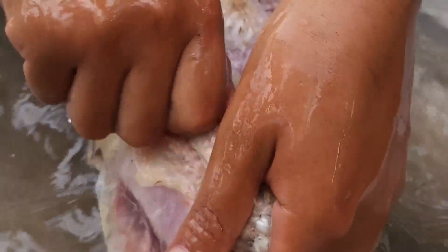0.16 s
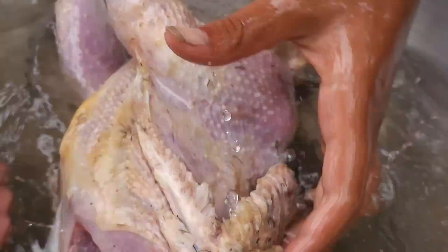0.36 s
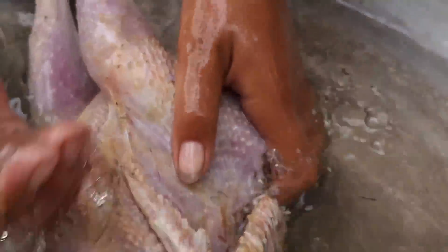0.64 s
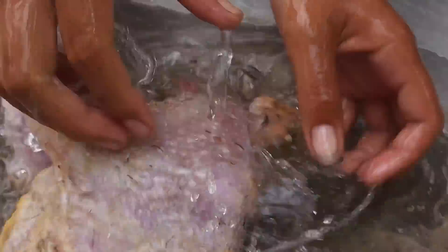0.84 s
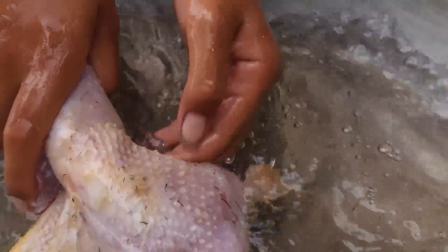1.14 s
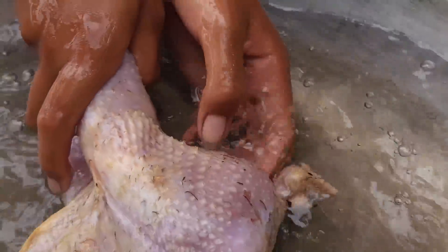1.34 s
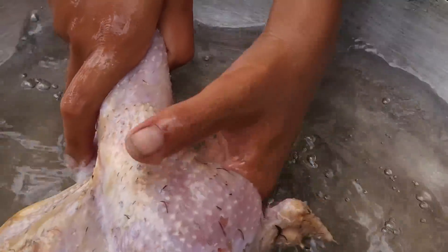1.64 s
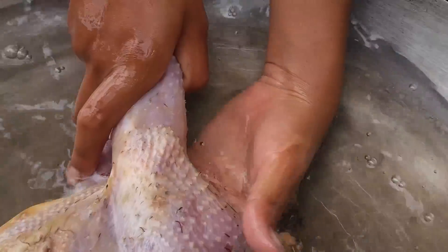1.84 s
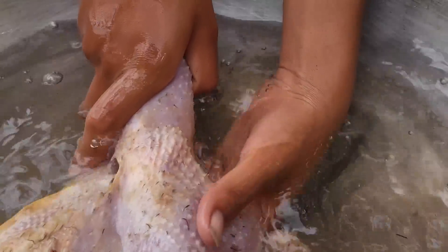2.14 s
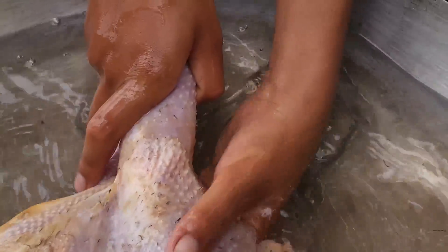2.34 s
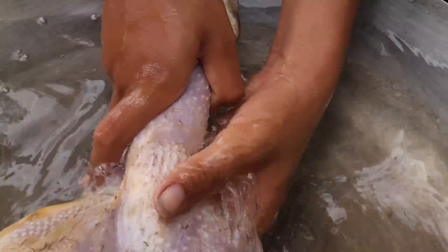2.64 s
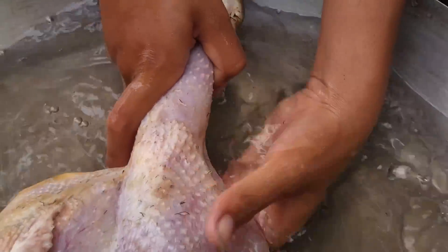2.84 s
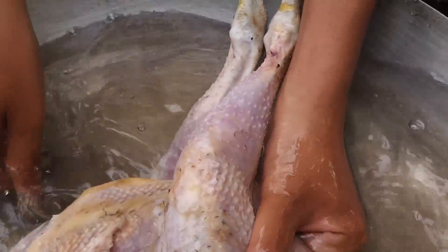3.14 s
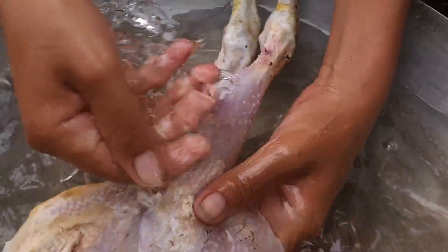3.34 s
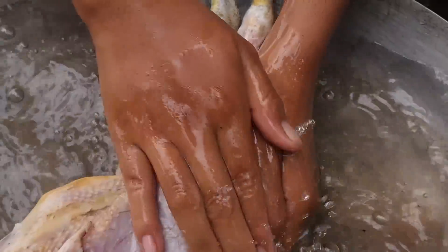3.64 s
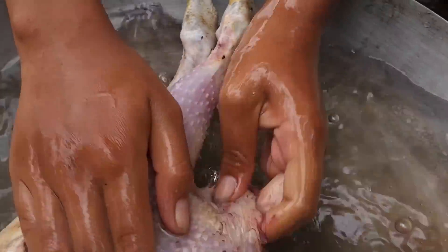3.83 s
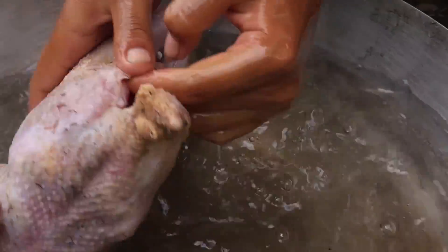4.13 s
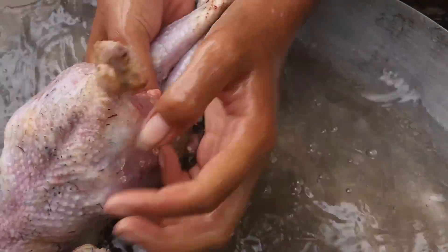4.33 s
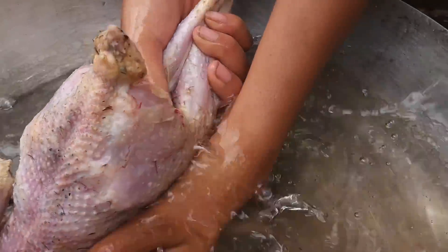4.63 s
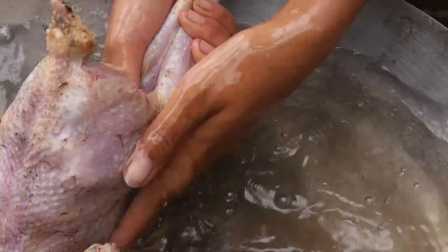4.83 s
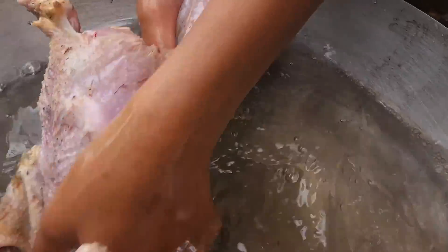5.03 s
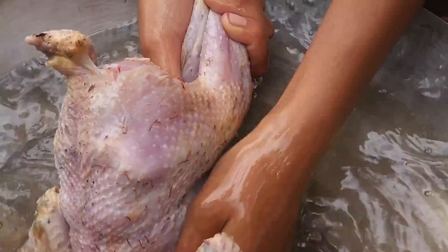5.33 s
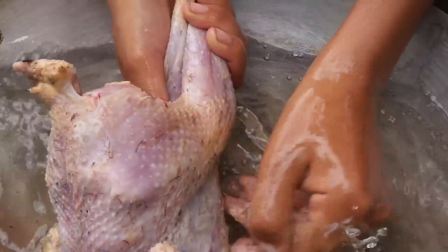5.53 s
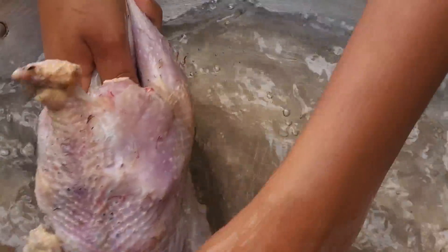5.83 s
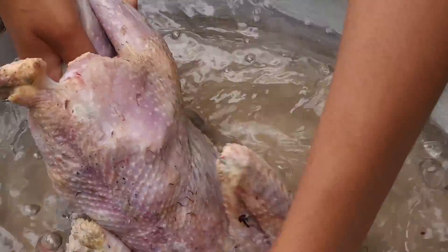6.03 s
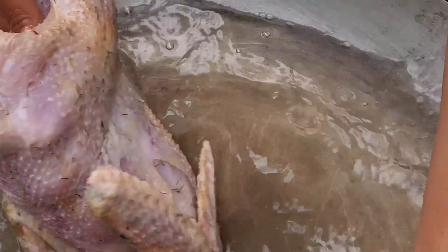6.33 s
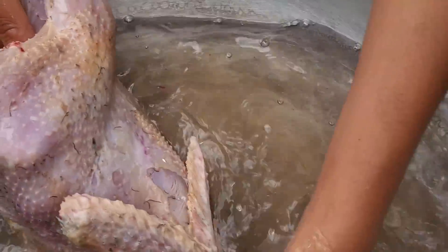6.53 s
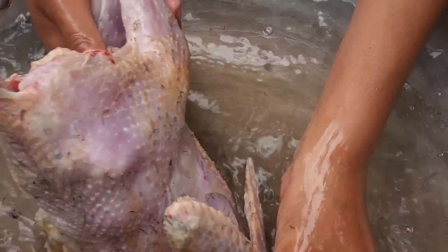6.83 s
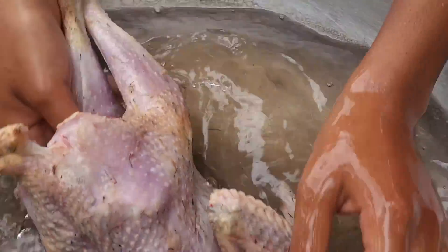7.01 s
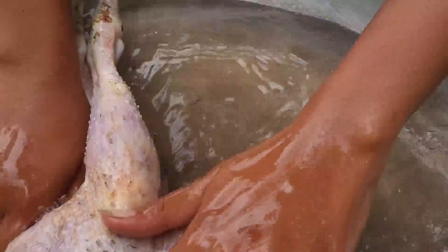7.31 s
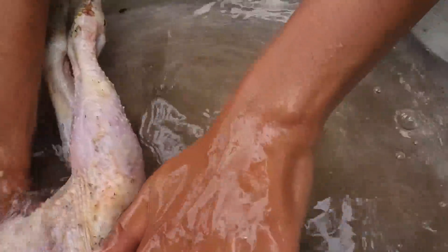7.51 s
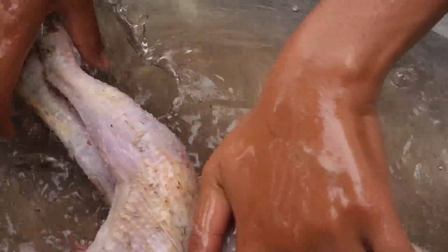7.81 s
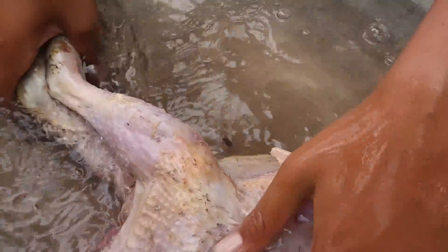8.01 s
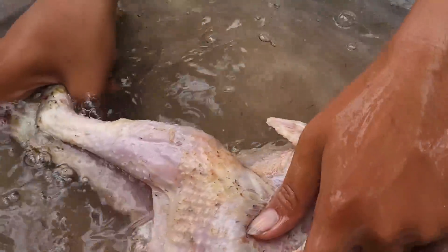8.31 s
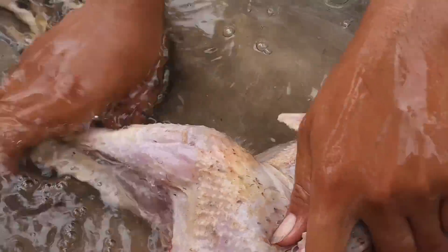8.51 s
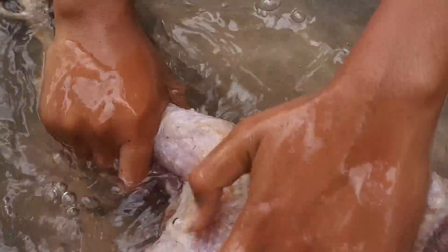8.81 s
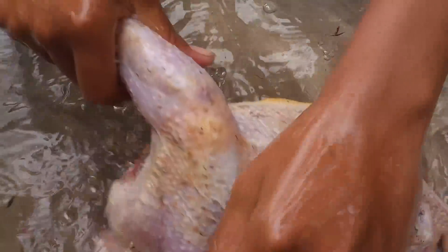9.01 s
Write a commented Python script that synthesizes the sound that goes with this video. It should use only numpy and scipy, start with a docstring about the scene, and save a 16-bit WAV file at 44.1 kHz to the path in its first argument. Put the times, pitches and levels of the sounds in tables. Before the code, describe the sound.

Close up, two hands wash a plucked chicken in a basin of water, with splashes, wet smacks, bubbly sloshing, gulps and plops outdoors.

```python
"""Two hands wash a plucked chicken in a wide basin of water, outdoors, close by.
Strokes are enveloped noise and bubbles: each sloshes, traps bubbles that ring and rise in pitch, and sprays.
Wet skin smacks and hollows gulp as decaying noise in a resonant band; splashes slap and single bubbles plop.
Behind lie a low outdoor rumble and a thin hiss of shaped noise, and a distant motor, a single sine."""
import sys
import numpy as np
from scipy import signal
from scipy.io import wavfile
from scipy.ndimage import uniform_filter1d

SR = 44100
rng = np.random.default_rng(int(sys.argv[2]) if len(sys.argv) > 2 else 0)


def master(y):
    """Save y as 16-bit WAV."""
    cut = np.clip(np.atleast_2d(y).T, -1, 1)
    pcm = np.round(cut * 32767)  # scale
    wavfile.write(sys.argv[1], SR, pcm.astype(np.int16))


N = 403956

# handfuls of water landing: (time [s], relative churning level [dB], relative spray level [dB],
# centre of the slap [Hz])
SPLASH_EVENTS = [(0.486, -67, -56, 2600), (0.852, -52, -40, 3200), (0.947, -45.5, -53, 1770),
                 (3.252, -43.5, -48, 2140), (3.486, -45, -47, 4300), (4.148, -57, -55, 3000),
                 (5.884, -51, -84, 2500), (6.152, -68, -39, 3940), (6.959, -57, -52, 2560),
                 (7.615, -45.5, -51, 2900), (7.907, -53, -49, 4100), (7.993, -55, -49.5, 2710),
                 (8.541, -77, -49, 1200), (8.93, -79, -50.5, 4770), (9.108, -51.5, -79, 4000)]


def from_db(db):
    """Level to amplitude: 20 dB is a factor of ten."""
    return 10 ** (np.asarray(db) / 20)


def rms_one(x):
    """Normalisation: scale to unit mean power."""
    return x / np.sqrt(np.mean(x ** 2) + 1e-20)


def at_hz(points, hz):
    """Logarithmic frequency: read a table with equal steps per octave."""
    table_hz, values = np.transpose(points)
    return np.interp(np.log(hz), np.log(table_hz), values)


def band(x, low_hz, high_hz, order=2):
    """Band limitation: a Butterworth band-pass."""
    sos = signal.butter(order, [low_hz, high_hz], "band", fs=SR, output="sos")
    return signal.sosfilt(sos, x)


def add(out, s, sound):
    """Superposition: mix a stereo sound in at time s."""
    i = int(np.clip(s * SR, 0, N - 1))
    out[:, i:i + sound.shape[1]] += sound[:, :N - i]


def panned(x, pan_db):
    """Interaural level difference: lean a sound to the left by pan_db."""
    return x * rms_one(from_db([[pan_db / 2], [-pan_db / 2]]))


def spread(mid, side, apart):
    """Sum and difference: an unrelated side signal, opposite in the two channels, widens the sound."""
    return mid + apart * side * [[1], [-1]]


def coloured(source, spectrum):
    """Spectral shaping by third-octave bands, each with its own left-right coherence; rms 1."""
    # left-right likeness: (frequency [Hz], correlation [-1..1])
    likeness = [(60, 1), (250, 0.9), (600, 0), (1200, 0), (3000, 0.25), (12000, 0.29)]
    out = 0
    edges = 20 * 2 ** (np.arange(30) / 3)
    for k, (low, high) in enumerate(zip(edges, edges[1:])):
        if high <= spectrum[0][0] or low >= spectrum[-1][0]:
            continue
        hz = np.sqrt(low * high)
        mid, side = band(source[k % 2], low, high)  # neighbouring bands take different sources
        alike = at_hz(likeness, hz)
        stereo = spread(np.sqrt(1 + alike) * mid, np.sqrt(1 - alike) * side, 1)
        out = out + from_db(at_hz(spectrum, hz)) * stereo
    return rms_one(out)


def evened(x, window_s):
    """Power normalisation over a short window, so that the stroke sets the loudness."""
    size = max(int(window_s * SR), 2)
    power = np.mean(x ** 2, axis=0)
    power = uniform_filter1d(uniform_filter1d(power, size), size)
    return x / np.sqrt(np.abs(power) + np.mean(power) / 100)


def patter(per_s, spread_db, life_s):
    """Shot noise: envelope of many random little impacts that decay exponentially; rms 1."""
    strength_db = spread_db * np.minimum(rng.exponential(1, N), 4.5)
    hits = (rng.random(N) < per_s / SR) * from_db(strength_db)
    power = signal.lfilter([1], [1, -np.exp(-1 / (life_s * SR))], hits ** 2 + 1e-12)
    return rms_one(np.sqrt(power))


def grit(envelope, low_hz, high_hz, apart):
    """Amplitude modulation: band-limited grains of water noise under an envelope; rms 1."""
    mid, side = band(rng.standard_normal((2, N)) * envelope, low_hz, high_hz)
    return rms_one(spread(mid, side, apart))


def bubble(hz, t60, rise, lag):
    """Bubble resonance: it swells in a cycle or two, rings and climbs in pitch as it nears the surface."""
    t = np.arange(int((t60 + abs(lag)) * SR) + 2) / SR
    t = np.maximum(t - [[0], [lag]], 0)  # a positive lag delays the right channel
    swell = 1 - np.exp(-.8 * hz * t)
    phase = 2 * np.pi * hz * (t + rise * t * t / 2)
    return swell * from_db(-60 * t / t60) * np.sin(phase)


def swarm(low_hz, high_hz, cycles, rise, spread_db, lag_s, count):
    """Damping per cycle: of bubbles random in size and place, small ones are higher and tend to die sooner."""
    out = np.zeros((2, N))
    for when, size, strength, damping, depth, place, path in rng.random((count, 7)):
        hz = low_hz * (high_hz / low_hz) ** size
        t60 = cycles * (.5 + damping) / hz
        ring = bubble(hz, t60, 2 * depth ** 2 * rise / t60, lag_s * (2 * path - .5))
        gain = from_db(spread_db * strength ** 2) * np.sqrt(hz)
        add(out, when * N / SR, gain * panned(ring, 12 * (place - .5)))
    return rms_one(out)


def burst(hz, t60, width, skirt_db, attack_share, apart):
    """Cavity resonance: a collapsing film shakes it, with a broad skirt; long bursts build up slowly."""
    t = np.arange(int(t60 * SR) + 400) / SR
    mid, side = rng.standard_normal((2, len(t)))
    attack = 1 - np.exp(-t / (attack_share * t60))
    shake = spread(mid, side, apart) * from_db(-60 * t / t60) * attack
    resonance = band(shake, hz / (1 + width), hz * (1 + width))
    skirt = band(shake, hz / 1.85, hz * 1.44, order=1)
    sound = resonance + from_db(skirt_db) * skirt
    # same energy as an exponential decay that starts at unit power
    energy = t60 * SR / np.log(1e6)
    return sound * np.sqrt(energy / np.mean(np.sum(sound ** 2, axis=1)))


def surge(s, length_s, attack_s, release_s, swell_db):
    """Build-up and relaxation: moving water grows, swells or fades, drops back and leaves a weaker run-off."""
    runoff_db, runoff_s = -18, 0.12  # water runs off the bird: relative level, time constant
    t = np.maximum(np.arange(0, N, 20) / SR - s, 0)
    after = np.maximum(t - length_s, 0)
    swell = from_db(swell_db * (np.minimum(t / length_s, 1) - .5))
    body = (1 - np.exp(-t / attack_s)) * swell
    release = np.exp(-after / release_s)
    runoff = from_db(runoff_db) * np.exp(-after / runoff_s)
    return body * np.maximum(release, runoff)


def agitation():
    """Power addition: strokes and splashes join the resting water in slosh, churning and spray."""
    # strokes of the hands: (time [s], length [s], relative deep slosh level [dB],
    # relative churning level [dB], relative spray level [dB], swell from start to end [dB])
    strokes = [(0.0, 0.025, -64, -48.5, -46, -6), (0.334, 0.11, -77, -54.5, -52.5, -2),
               (0.405, 0.13, -72, -52, -55.5, 8.5), (0.585, 0.2, -79, -53, -51.5, -1),
               (0.795, 0.2, -67.5, -49.5, -48.5, -12.5), (0.98, 0.1, -69, -61, -53, 1),
               (1.121, 0.09, -70, -58.5, -60.5, -4.5), (1.33, 0.18, -102, -85, -66.5, -14),
               (1.538, 0.11, -57.5, -67.5, -65, -8), (1.734, 0.15, -62.5, -70, -96, 6),
               (1.932, 0.23, -60, -70.5, -96, -11), (2.15, 0.35, -62, -68, -91, -15),
               (2.386, 0.14, -69.5, -61.5, -71, 0), (2.563, 0.47, -67.5, -67.5, -66.5, -13),
               (2.86, 0.26, -61, -66, -68.5, -8), (3.132, 0.21, -61.5, -49.5, -58, -2.5),
               (3.35, 0.21, -59, -53.5, -52, -2), (3.597, 0.047, -59.5, -46.5, -45.5, 7),
               (3.777, 0.048, -64.5, -85, -76.5, 21.5), (3.975, 0.05, -54, -58.5, -61, 8),
               (4.066, 0.41, -64, -64, -64, -9.5), (4.456, 0.26, -69.5, -66.5, -64.5, -3.5),
               (4.687, 0.18, -61.5, -65, -61, -2), (4.886, 0.26, -63.5, -57, -54.5, 7.5),
               (5.149, 0.24, -56.5, -64, -66, 7), (5.361, 0.072, -82, -57, -56, 23.5),
               (5.561, 0.27, -77, -58.5, -58, 7), (5.809, 0.24, -64.5, -52, -53.5, -1),
               (6.111, 0.15, -79, -57, -58, 14.5), (6.274, 0.28, -80.5, -71.5, -66.5, -4),
               (6.95, 0.2, -66.5, -56.5, -58, 1.5), (7.18, 0.14, -58.5, -52, -53.5, 6),
               (7.451, 0.19, -68.5, -55, -58.5, -7), (7.614, 0.24, -71.5, -50, -50.5, 3.5),
               (7.877, 0.21, -77.5, -58, -58, -14), (7.998, 0.64, -79.5, -73.5, -69.5, -18.5),
               (8.516, 0.24, -64, -59, -60.5, -7), (8.808, 0.2, -73, -58, -56.5, 2),
               (8.992, 0.15, -90, -69, -56.5, 19)]
    rest_db = [-85, -83, -81]  # slosh, churning, spray: the basin never quite settles
    stroke_attack_s, stroke_release_s = 0.0041, 0.018  # time constants
    splash_attack_s, splash_hold_s, splash_release_s = 0.0011, 0.02, 0.013
    thrown_db = -1  # droplets thrown by a splash, relative to its spray level
    steps = np.arange(0, N, 20)  # every 20th sample is enough for slow curves
    power = np.outer(from_db(rest_db) ** 2, np.ones(len(steps)))
    for s, length_s, *db, swell_db in strokes:
        course = surge(s, length_s, stroke_attack_s, stroke_release_s, swell_db)
        power += np.outer(from_db(db) ** 2, course ** 2)
    for s, churn_db, spray_db, _ in SPLASH_EVENTS:
        course = surge(s, splash_hold_s, splash_attack_s, splash_release_s, 0)
        power[1:] += np.outer(from_db([churn_db, spray_db + thrown_db]) ** 2, course ** 2)
    return [np.interp(np.arange(N), steps, np.sqrt(p)) for p in power]


def spray(mist_db, fizz_db):
    """Droplet impact: drops tick on the surface and leave tiny ringing bubbles, over a fine mist."""
    # colour of the ticks and mist: (frequency [Hz], relative level [dB per Hz])
    colour = [(2000, -29), (3000, -2), (4000, -3), (7500, -1), (10000, -25), (13000, 6.5), (16000, -31)]
    drops = patter(per_s=420, spread_db=6.5, life_s=0.0016)
    ticks = coloured(rng.standard_normal((2, 2, N)) * (drops + from_db(mist_db)), colour)
    fizz = swarm(2700, 8200, cycles=62, rise=.14, spread_db=15, lag_s=.0002, count=3800)
    finest = swarm(8000, 15000, cycles=45, rise=.05, spread_db=26, lag_s=.0002, count=1200)
    droplets = ticks + from_db(fizz_db) * (fizz + from_db(-5.0) * finest)
    return evened(droplets, .06)


def washing(slosh_gain, churn_gain, spray_gain):
    """Air entrainment: strokes break water into grains; harder churning favours the ringing bubbles."""
    laps = patter(per_s=200, spread_db=4, life_s=0.005) + from_db(-12)
    big = swarm(420, 850, cycles=15, rise=.3, spread_db=17, lag_s=.00015, count=600)
    middling = swarm(740, 2700, cycles=44, rise=.35, spread_db=20, lag_s=.00025, count=3000)
    # bubbles stand 2 to 6 dB above the grains
    churn_db = 20 * np.log10(churn_gain)
    trapped = from_db(np.clip(3 + .3 * (churn_db + 52), 2, 6))
    low_grit = from_db(-3) * grit(laps, 165, 290, apart=0.13)
    upper_grit = from_db(-6) * grit(laps, 414, 656, apart=0.41)
    slosh = evened(big + low_grit + upper_grit, 0.05)
    churn = evened(trapped * middling + grit(laps, 875, 2770, apart=1.0), 0.05)
    droplets = spray(mist_db=-19, fizz_db=-1.0)
    return panned(slosh_gain * slosh + churn_gain * churn + spray_gain * droplets, 3.6)


def drips(splashing, level_db, follow):
    """Bubble resonance: stray drops from hands and bird, louder while the water is being worked."""
    drops = swarm(600, 4200, cycles=14, rise=.2, spread_db=9, lag_s=.0002, count=230)
    return panned(from_db(level_db) * rms_one(splashing) ** follow * drops, 6)


def background(rumble_db, hiss_db, air_db, motor_hz):
    """Stationary noise: rumble, hiss with a band of air, and a far motor tone that sinks, then comes up late."""
    # colours of the two noises: (frequency [Hz], relative level [dB per Hz])
    rumble_colour = [(22, -11), (35, -9.5), (55, 2.5), (80, -1), (130, -1.5), (220, -9), (400, -25),
                     (1500, -30.5), (3000, -24.5)]
    hiss_colour = [(1500, -25), (3000, 2.5), (4500, 8), (7000, 12.5), (12000, 7), (16000, 6)]
    # the distant motor: (time [s], level [dB])
    motor_course = [(0, -81), (.6, -74), (1.2, -126), (7.9, -73), (8.4, -66.5), (9.16, -66)]
    t = np.arange(N) / SR
    rumble = from_db(rumble_db) * coloured(rng.standard_normal((2, 2, N)), rumble_colour)
    hiss = panned(from_db(hiss_db) * coloured(rng.standard_normal((2, 2, N)), hiss_colour), 1.9)
    air = from_db(air_db) * rms_one(band(rng.standard_normal((2, N)), 7900, 11550, order=10))
    motor_db = np.interp(t, *np.transpose(motor_course))
    motor = from_db(motor_db) * np.sqrt(2) * np.sin(2 * np.pi * motor_hz * t)
    return rumble + hiss + air + motor


def smacks(level_db, pan_db):
    """Impulsive excitation: short bright smacks of wet skin and landing water, scattered left of centre."""
    # smacks: (time [s], relative level [dB], centre [Hz], 60 dB decay time [s])
    smack_events = [(0.0074, -35, 6070, 0.014), (0.649, -32, 5950, 0.0066), (0.797, -36, 4670, 0.0069),
                    (1.069, -39.5, 4130, 0.0068), (1.1021, -27.5, 7500, 0.0062),
                    (1.339, -45.5, 2360, 0.022), (1.54, -38, 7700, 0.011), (1.967, -47.5, 3030, 0.013),
                    (2.123, -44.5, 6900, 0.0072), (2.654, -32.5, 6550, 0.0071), (3.153, -28, 6130, 0.0058),
                    (3.4433, -38.5, 6470, 0.01), (3.525, -32, 5460, 0.0077), (3.5414, -31.5, 5000, 0.0081),
                    (3.617, -33, 6250, 0.01), (3.636, -31, 8550, 0.013), (4.0173, -40, 3420, 0.013),
                    (4.129, -41, 3330, 0.0085), (4.296, -43.5, 2500, 0.047), (4.329, -22.5, 6750, 0.0058),
                    (4.411, -38, 8000, 0.019), (4.4947, -42.5, 7030, 0.006), (4.5338, -39, 7460, 0.011),
                    (4.584, -37.5, 5340, 0.013), (4.6554, -28, 3300, 0.0059), (5.024, -34, 6750, 0.017),
                    (5.1035, -23, 3100, 0.009), (5.1484, -27, 5040, 0.0037), (5.645, -40.5, 8380, 0.011),
                    (5.827, -40, 7160, 0.012), (5.949, -36.5, 6900, 0.011), (6.155, -25, 5600, 0.017),
                    (6.532, -40.5, 3250, 0.011), (6.575, -38, 5470, 0.013), (6.813, -45.5, 3700, 0.012),
                    (6.8668, -45, 3530, 0.011), (7.073, -35.5, 5750, 0.014), (7.286, -38, 5500, 0.01),
                    (7.309, -39, 3350, 0.0086), (7.446, -36, 5950, 0.015), (7.6145, -30.5, 2850, 0.0082),
                    (7.899, -33, 7100, 0.012), (7.954, -35, 7200, 0.0077), (8.0681, -40, 2900, 0.018),
                    (9.107, -31, 3130, 0.0089)]
    out = np.zeros((2, N))
    for s, db, hz, t60 in smack_events:
        sound = burst(hz, np.clip(t60, .002, .2), width=0.13, skirt_db=-7.5, attack_share=0.15, apart=1.0)
        add(out, s, from_db(db + level_db) * panned(sound, pan_db + rng.normal()))
    return out


def gulps(level_db, thud_db, thud_hz, thud_t60):
    """Cavity closure: dull gulps break up into dying runs of bubbles; deeper ones thud more in the water."""
    # air pockets closing under hand and bird: (time [s], relative level [dB], centre [Hz],
    # 60 dB decay time [s], held to 0.2 s at most in the gulp itself)
    pockets = [(0.019, -44.5, 645, 0.029), (0.455, -43, 800, 0.046), (0.523, -46.5, 674, 0.11),
               (1.066, -47, 850, 0.16), (1.185, -48, 368, 0.052), (1.741, -43, 410, 0.027),
               (1.942, -44.5, 430, 0.087), (2.169, -39, 372, 0.054), (2.361, -43.5, 540, 0.17),
               (2.602, -40, 410, 0.052), (3.987, -47, 810, 0.065), (4.129, -43, 750, 0.039),
               (4.714, -51.5, 800, 0.44), (4.779, -50.5, 660, 0.14), (5.091, -45.5, 504, 0.32),
               (5.328, -48.5, 396, 0.16), (6.927, -52.5, 378, 0.13), (7.294, -49.5, 272, 0.032),
               (7.365, -46.5, 634, 0.022)]
    # bubbles shed by a gulp: level and fade relative to it, decay time, pitch rise as a share per s
    burble_db, burble_fade_db, burble_t60_s, burble_rise_per_s = 5, 25, 0.023, 20
    out = np.zeros((2, N))
    for s, db, hz, t60 in pockets:
        gulp = burst(hz, np.clip(t60, .002, .2), width=0.66, skirt_db=-1.0, attack_share=0.007, apart=0.53)
        add(out, s, from_db(db + level_db) * gulp)
        thud = bubble(thud_hz * np.exp(rng.normal(0, 0.098)), thud_t60, 0, 0)
        add(out, s, from_db(db + thud_db) * (thud_hz / hz) ** 2 * thud)
        for age, octaves in rng.random(size=(6, 2)):
            ring = bubble(hz * 2 ** (2 * octaves - .5), burble_t60_s, burble_rise_per_s, 0)
            add(out, s + age * t60, from_db(db + burble_db - burble_fade_db * age) * ring)
    return panned(band(out, 65, 1800), 3.7)


def curl(start_hz, end_hz, length_s, lag):
    """Shrinking resonator: an open air pocket swells, then fades as its pitch climbs unevenly, ever faster."""
    t = np.arange(int(length_s * SR)) / SR
    age = t / length_s
    waver = 0.037 * np.interp(age, np.linspace(0, 1, 10), rng.standard_normal(10))  # share of the pitch
    hz = start_hz * (end_hz / start_hz) ** (age ** 1.5) * (1 + waver)
    swell = age * (1 - age) ** 2
    ring = swell / swell.max() * np.sin(2 * np.pi * np.cumsum(hz) / SR)
    return np.array([ring, np.interp(t - lag, t, ring)])


def plops(level_db, ring_scale, lag_s, wobble):
    """Bubble resonance: big bubbles reach the left first, wobble in moving water; plops throw spatter."""
    # single plops and drips: (time [s], relative level [dB], starting pitch [Hz],
    # 60 dB decay time before ring_scale [s], left over right [dB])
    plop_events = [(0.374, -33.5, 4140, 0.0027, 1), (0.46, -31, 1600, 0.019, 4),
                   (0.463, -42, 610, 0.042, 0), (0.484, -28, 2380, 0.013, 23),
                   (0.501, -31, 4150, 0.012, 10), (0.528, -26.5, 3120, 0.0092, 11),
                   (0.802, -24, 797, 0.05, 6), (0.822, -23, 2700, 0.015, 5), (0.853, -28, 780, 0.02, 8),
                   (0.871, -21, 1640, 0.0061, 2), (0.977, -16.5, 5780, 0.0043, 8),
                   (1.575, -31, 950, 0.015, -2), (1.618, -31.5, 950, 0.014, -2),
                   (1.745, -20, 423, 0.0076, 3), (1.757, -19.5, 1970, 0.0036, 7),
                   (1.95, -23, 566, 0.007, 9), (2.244, -25, 570, 0.0082, 1), (2.323, -42, 970, 0.015, 3),
                   (2.533, -24, 2000, 0.0031, 8), (2.579, -14.5, 1182, 0.013, 2),
                   (2.609, -27, 575, 0.0085, -16), (2.779, -30, 3110, 0.0064, 8),
                   (2.857, -17, 1257, 0.031, 3.5), (2.901, -31, 1710, 0.011, 8),
                   (2.951, -26, 613, 0.012, 1), (3.037, -19.5, 1090, 0.0039, 6),
                   (3.145, -26.5, 568, 0.034, 3), (3.152, -23, 2490, 0.0066, 7),
                   (3.157, -24, 3200, 0.0093, 5), (3.263, -21.5, 980, 0.007, -2),
                   (3.503, -19, 2380, 0.0056, 7), (3.511, -34, 1310, 0.025, -2),
                   (3.604, -34, 1310, 0.022, 4), (3.653, -31.5, 926, 0.026, 11),
                   (3.716, -22.5, 2220, 0.0087, 10.5), (4.086, -17.5, 1450, 0.0051, 1),
                   (4.332, -6, 2680, 0.0023, 5.5), (4.535, -20.5, 1114, 0.0069, 5),
                   (4.584, -29, 2150, 0.0085, 7), (4.608, -26.5, 1560, 0.0081, 11),
                   (5.06, -11, 3400, 0.0019, 6), (5.149, -19, 925, 0.0079, 11),
                   (5.195, -34.5, 241, 0.063, -0.5), (5.403, -29.5, 930, 0.018, 3),
                   (5.593, -18.5, 2400, 0.0043, 9), (5.911, -29.5, 1240, 0.022, 4),
                   (5.99, -28, 1100, 0.01, 4), (7.075, -29.5, 820, 0.0092, 3), (7.67, -29, 890, 0.011, 7),
                   (8.528, -22.5, 1280, 0.011, 5), (8.548, -21.5, 1490, 0.01, 10),
                   (8.585, -39.5, 980, 0.028, 2), (8.65, -37, 524, 0.027, 5)]
    # air pockets that curl shut behind a hand: (time [s], relative level [dB],
    # nominal starting pitch [Hz], nominal final pitch [Hz], length [s])
    curl_events = [(2.625, -52, 1180, 2400, 0.019), (2.873, -39, 1720, 2720, 0.025),
                   (3.155, -51, 512, 520, 0.059), (3.688, -42.5, 1200, 2100, 0.014),
                   (4.084, -32.5, 1740, 2640, 0.014), (4.242, -51, 390, 700, 0.028),
                   (4.605, -44, 1620, 2390, 0.019), (4.256, -51.5, 1370, 2120, 0.02),
                   (4.677, -52, 2000, 3200, 0.031), (4.78, -55, 880, 1430, 0.063),
                   (4.826, -55, 1360, 1510, 0.047), (5.039, -35, 1780, 2880, 0.0088),
                   (5.35, -55, 558, 1060, 0.077), (5.631, -47, 812, 1490, 0.05),
                   (6.193, -42.5, 1020, 1520, 0.031), (6.644, -55.5, 1300, 2730, 0.036),
                   (7.146, -41, 780, 1420, 0.058), (8.685, -48.5, 694, 1380, 0.036),
                   (9.115, -42.5, 1336, 1370, 0.053)]
    rise_per_s_per_khz = 10  # smaller bubbles climb faster: share of the pitch per s, per kHz
    curl_pan_db = 8
    spatter_db, spatter_hz, spatter_t60_s = -33, 3400, 0.13  # level relative to the plop's table entry
    rings = []
    spatter = np.zeros((2, N))
    for s, db, hz, t60, pan_db in plop_events:
        rise = rise_per_s_per_khz * hz / 1000
        ring = bubble(hz, max(t60 * ring_scale, .002), rise, lag_s * (.5 + rng.random()))
        rings.append((s, db, pan_db, ring))
        centre_hz = np.sqrt(hz * spatter_hz)  # midway in octaves
        drops = burst(centre_hz, spatter_t60_s, width=0.6, skirt_db=0, attack_share=0.09, apart=1)
        add(spatter, s, from_db(db + spatter_db) * drops)
    for s, db, start_hz, end_hz, length_s in curl_events:
        rings.append((s, db, curl_pan_db, curl(start_hz, end_hz, length_s, lag_s)))
    out = np.zeros((2, N))
    for s, db, pan_db, ring in rings:
        t = np.arange(ring.shape[1]) / SR
        # the wobble sets in over 20 ms, so it mostly shakes the long rings
        shaken = np.interp(t, np.arange(64) / 200, rng.standard_normal(64)) * np.minimum(t / .02, 1)
        add(out, s, from_db(db + level_db) * panned(ring * (1 + wobble * shaken), pan_db))
    return out + spatter * patter(per_s=220, spread_db=10.5, life_s=0.0036)


def slaps():
    """Cavity resonance: a handful of water hits the surface and pinches off a cavity."""
    over_spray_db, t60_s = 8.5, 0.098
    out = np.zeros((2, N))
    for s, _, spray_db, hz in SPLASH_EVENTS:
        slap = burst(hz, t60_s, width=0.29, skirt_db=-9.5, attack_share=0.037, apart=1.0)
        add(out, s, from_db(spray_db + over_spray_db) * slap)
    return panned(out, 5.3)


def bumps(t60):
    """Low-frequency impact: the bird is turned over and bumps softly against the basin floor."""
    # bumps: (time [s], level [dB], centre [Hz])
    bump_events = [(3.999, -48.5, 91), (4.11, -54.5, 92.5)]
    out = np.zeros((2, N))
    for s, db, hz in bump_events:
        add(out, s, from_db(db) * burst(hz, t60, width=.5, skirt_db=-15, attack_share=.05, apart=.1))
    return out


def basin(x, t60, wet_db):
    """Reflection as convolution: the basin wall and the ground send back a short scatter of echoes."""
    t = np.arange(SR // 4) / SR
    decay = from_db(-60 * t / t60) * (t > .002)  # nothing returns in the first 2 ms
    echoes = band(rng.standard_normal((2, len(t))) * decay, 200, 9000)
    echoes = echoes / np.sqrt(np.sum(echoes ** 2, axis=1, keepdims=True))
    return x + from_db(wet_db) * signal.fftconvolve(x, echoes, axes=1)[:, :N]


def scene():
    """Superposition: water sounds with the basin's echoes, soft bumps and the background."""
    slosh_gain, churn_gain, spray_gain = agitation()
    water = washing(slosh_gain, churn_gain, spray_gain)
    water = water + drips(np.maximum(churn_gain, spray_gain), level_db=-62, follow=.75)
    water = water + smacks(level_db=3.5, pan_db=6.5)
    water = water + gulps(level_db=2.5, thud_db=24.0, thud_hz=217, thud_t60=0.033)
    water = water + plops(level_db=1.16, ring_scale=1.33, lag_s=0.00019, wobble=0.45)
    water = basin(water + slaps(), t60=0.04, wet_db=-15.5)
    behind = background(rumble_db=-64.5, hiss_db=-73.5, air_db=-69.0, motor_hz=110.4)
    return water + bumps(t60=0.22) + behind


def record(dry):
    """Band limitation: a steep elliptic low-pass cuts the top."""
    cutoff_hz = 16200
    return signal.sosfilt(signal.ellip(10, .1, 80, cutoff_hz, fs=SR, output="sos"), dry)


dry = scene()
out = record(dry)
master(out)
```